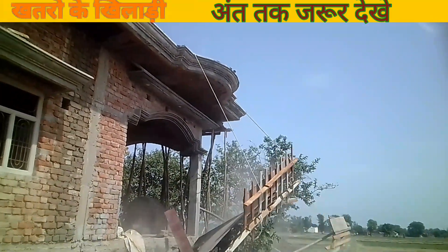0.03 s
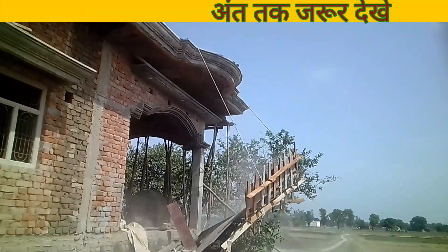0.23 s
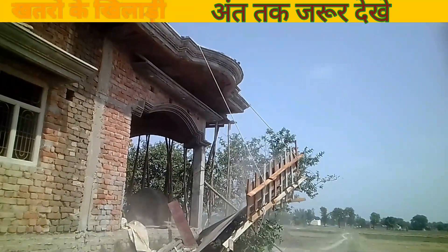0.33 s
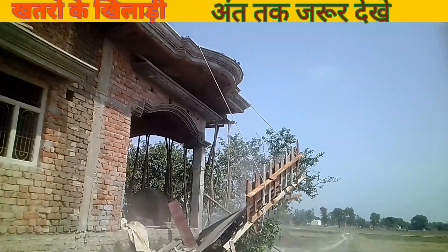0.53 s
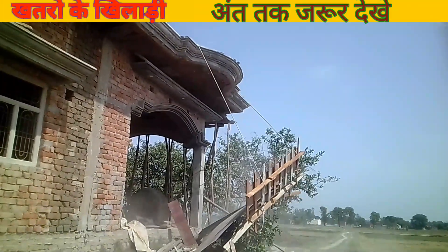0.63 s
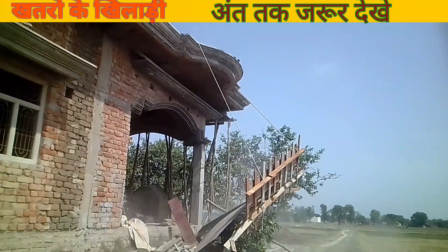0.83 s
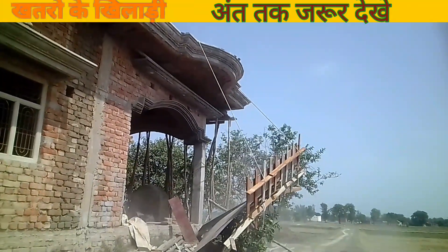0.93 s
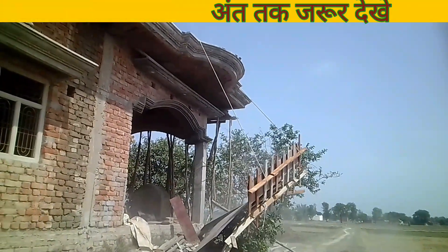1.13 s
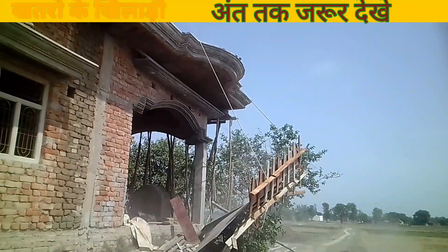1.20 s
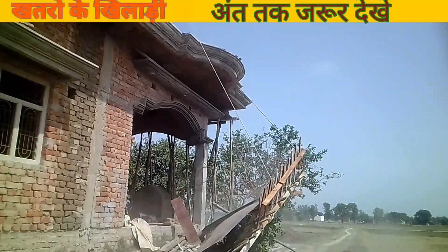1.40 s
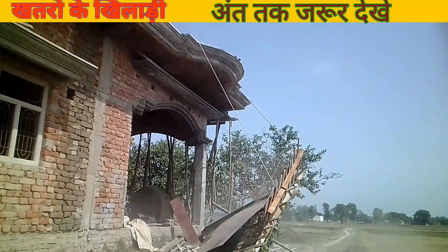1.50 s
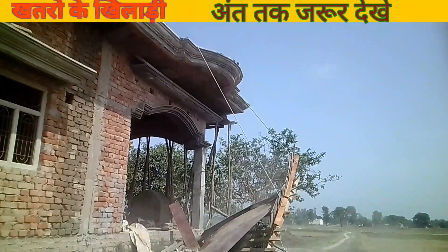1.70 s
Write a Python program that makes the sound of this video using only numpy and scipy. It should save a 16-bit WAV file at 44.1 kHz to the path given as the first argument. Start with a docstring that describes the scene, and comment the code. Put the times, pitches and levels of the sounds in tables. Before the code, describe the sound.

Quiet open air, then a collapsing timber roof bangs and clatters in two quick surges, settles into weakening knocks, and gives one last small clatter; heard from a distance on a phone with slight echo.

```python
"""Quiet outdoor air is heard first; then a timber and sheet-metal roof is pulled down at some distance.
Debris tumbles in a dense clatter: random impulses excite resonances of timber, sheet and grit.
Beams thud as decaying modes; boards and sheets knock and splinters tick as filtered noise bursts.
An open porch adds a short echo, and a rising tone squeaks as a sheet edge rubs."""
import sys
import numpy as np
from scipy import signal
from scipy.fft import rfft, irfft
from scipy.io import wavfile
from scipy.ndimage import uniform_filter1d

SR = 44100
rng = np.random.default_rng(int(sys.argv[2]) if len(sys.argv) > 2 else 0)


def ratio_of_db(decibels):
    """Turn decibels (scalar or array-like) into linear amplitude factors; 0 dB maps to 1."""
    return 10 ** (np.asarray(decibels, float) / 20)


def persist_wave(psi):
    """Save psi, clipped to +-1, as 16-bit WAV."""
    counts = np.round(np.clip(psi, -1, 1) * 32767).astype(np.int16)
    wavfile.write(sys.argv[1], SR, np.atleast_2d(counts).T)


N = 77175

# Spectrum of the outdoor air. Each row: frequency in Hz, relative spectral level in dB.
AIR_SPECTRUM = [(15, -18), (25, -11), (43, -17), (100, -4.5), (158, -12.5), (278, -4.5), (491, 2),
                (806, -21), (1840, -9.5), (2620, -16.5), (3100, -26.5), (5000, -27), (7080, -21.5),
                (9200, -28.5), (15400, -40.5)]
# Low resonances of the shaken ground. Each row: frequency in Hz, level in dB above the timber rumble.
GROUND_RESONANCES = [(40, -64), (70, -45), (115, -35.5)]
# A rubbing sheet edge. The row: start in seconds, length in seconds, frequency at the start in Hz,
# rise in Hz per second, level in dB.
EDGE_SQUEAK = (1.398, .072, 2620, 1300, -64)
# Spectral dips of the ground echo. Each row: frequency in Hz, width in Hz, depth from 0 to 1.
GROUND_DIPS = [(796, 160, 0.36), (3105, 430, 0.52)]
# Modes of the timber. Each row: frequency in Hz, relative level in dB, t60 in seconds.
TIMBER_MODES = [(199, -5, 0.24), (250, -6, 0.36), (282.4, -11.5, 0.35), (342.8, 6.5, 0.051),
                (376.8, 0.5, 0.11), (402.7, 4.5, 0.047), (456, -4, 0.089), (495, 5.5, 0.079),
                (534.6, -4.5, 0.12), (603, 0.5, 0.087), (667.5, -4, 0.057), (762, -1, .07)]
# Resonances of sheet metal. Each row: frequency in Hz, nominal width in Hz, relative level in dB.
SHEET_RESONANCES = [(1023.5, 58, 3.5), (1375, 57, 1.5), (1610, 120, -6), (1860, 350, -3.5), (2250, 100, 1),
                    (2562, 460, -6.5)]
# Resonances of grit. Each row: frequency in Hz, nominal width in Hz, relative level in dB.
GRIT_RESONANCES = [(3240, 990, 0), (4310, 500, -5), (5120, 595, -1), (6840, 670, -14.5), (8200, 330, -16),
                   (9300, 1200, -43), (11900, 3100, -46.5)]
# Splinters and stones. Each row: time in seconds, peak level at the source in dB, pitch in Hz.
SPLINTER_TICKS = [(0.0996, -68.5, 4170), (0.119, -69, 4150), (0.2284, -32.5, 4260), (0.4064, -25, 3510),
                  (0.4117, -23, 3720), (0.416, -13, 3470), (0.4217, -24, 3180), (0.4464, -35, 3400),
                  (0.5674, -65, 4050), (0.6566, -39, 3330), (0.6888, -50.5, 3980), (0.7294, -57, 4980),
                  (0.7731, -45, 3250), (0.7886, -55.5, 3780), (0.829, -64.5, 3940), (0.8444, -61, 3350),
                  (0.967, -58, 3850), (1.0037, -49.5, 3260), (1.1506, -61.5, 6480), (1.2999, -64.5, 3420),
                  (1.329, -68, 3800), (1.4566, -62.5, 5600), (1.5341, -29.5, 5140), (1.6992, -55.5, 4900)]
# Beam blows. Each row: time in seconds, peak level at the source in dB, pitch in Hz,
# ring time as a share of the modes' t60, push (rise time of the blow) in seconds.
BEAM_THUDS = [(0.109, -48.5, 417, 0.42, 0.0057), (0.193, -25.5, 680, 1, 0.0082),
              (0.22, -19.5, 503, 0.95, 0.0072), (0.245, -14.5, 361, 0.6, 0.0045),
              (0.27, -18, 343, 0.6, 0.013), (0.407, -27, 268, 0.42, 0.0077),
              (0.455, -23, 459, 0.75, 0.0042), (0.474, -28, 619, 0.27, 0.00933),
              (0.493, -21.5, 584, 0.26, 0.00768), (0.529, -34, 253, 0.69, 0.0044),
              (0.569, -29, 396, 1, 0.0025), (0.603, -26, 394, 0.62, 0.007),
              (0.611, -23.5, 407, 0.38, 0.012), (0.633, -22.5, 378, 0.33, 0.0091),
              (0.654, -25.5, 501, 0.88, 0.0082), (0.691, -34.5, 374, 0.54, 0.007),
              (0.709, -38, 396, 0.6, 0.007), (0.767, -33.5, 458, 1, 0.0073), (0.789, -38, 495, 0.52, 0.007),
              (0.803, -36, 339, 0.54, 0.0099), (0.846, -36, 495, 0.63, 0.01),
              (0.864, -47.5, 560, 0.6, 0.0098), (0.934, -39, 231.4, 1, 0.0042),
              (0.986, -38, 250, 0.45, 0.0074), (1.003, -37, 529, 1, 0.0082),
              (1.027, -36.5, 391, 0.27, 0.0059), (1.061, -41.5, 453, 0.55, 0.007),
              (1.206, -59, 473, 1, 0.0037), (1.306, -49, 570, 0.43, 0.00732),
              (1.324, -55, 495, 0.23, 0.0068), (1.534, -38.5, 660, 0.45, 0.0066),
              (1.56, -45, 418, 0.9, 0.0071), (1.6, -36, 469, 0.68, 0.0045),
              (1.697, -44.5, 400, 0.48, 0.0055), (1.733, -45, 357, 0.97, 0.011)]
# Settling boards and sheets. Each row: time in seconds, peak level at the source in dB, pitch in Hz,
# t60 in seconds, grit level in dB relative to the pitched part, sharpness Q.
BOARD_KNOCKS = [(0.1206, -55.5, 1554, 0.04, -19, 4.2), (0.165, -43.5, 2190, 0.092, -29, 3),
                (0.18, -29, 1620, 0.24, -6, 1.47), (0.1996, -24, 1294, 0.24, -16.5, 2.9),
                (0.2229, -20.5, 1800, 0.24, -21, 3), (0.2503, -16.5, 2240, 0.24, -10, 3.64),
                (0.2641, -15.5, 1020, 0.066, -3, 1.6), (0.2799, -14.5, 1410, 0.091, -32, 1.4),
                (0.2983, -16.5, 1380, 0.035, -28, 4.6), (0.4032, -29, 2050, 0.24, -12, 2.3),
                (0.4135, -9.5, 2290, 0.066, -17, 2.8), (0.4189, -12.5, 2144, 0.03, -22.5, 4.05),
                (0.4264, -23.5, 2053, 0.027, -9, 7.9), (0.4479, -23, 1900, 0.1, -13.5, 4),
                (0.4633, -20.5, 1787, 0.089, -21, 3.5), (0.526, -29.5, 2430, 0.092, -21, 4.8),
                (0.5645, -31, 1210, 0.078, -8.5, 2.4), (0.598, -33.5, 1404, 0.1, -17, 3),
                (0.6554, -38, 2250, 0.075, -18, 3.1), (0.7871, -45.5, 2380, 0.1, -14.5, 5),
                (0.9364, -56, 1960, 0.07, -5.5, 4), (0.944, -47, 2400, 0.044, -24, 5.8),
                (0.9716, -49, 1780, 0.08, -16, 6.3), (1.0024, -38.5, 2030, 0.049, -20, 5),
                (1.0174, -37, 1573, 0.027, -26, 2.6), (1.0289, -39, 1490, 0.074, -31, 5.2),
                (1.0494, -50, 1410, 0.063, -23.5, 6.4), (1.295, -54, 2093, 0.1, -17, 5.2),
                (1.3071, -42, 1875, 0.092, -20, 3.5), (1.3197, -45, 1840, 0.054, -24, 3.5),
                (1.4586, -49.5, 1520, 0.07, -19.5, 2.1), (1.5332, -26.5, 1520, 0.14, -8, 1.85),
                (1.5443, -35.5, 1490, 0.11, -7, 6.6), (1.5968, -24.5, 1600, 0.093, -7, 3.8),
                (1.618, -45, 1820, 0.039, 5, 5.9), (1.6859, -45, 1800, 0.071, -17, 12),
                (1.726, -46.5, 1800, 0.063, -18.5, 6.9)]
# Course of the fall. Each row: time in seconds, then the levels at the source in dB of
# timber rumble, sheet clatter and grit.
FALL_LEVELS = [(0.0, -69.5, -79.5, -82), (0.14, -61.5, -70.5, -80), (0.218, -28, -72, -87.5),
               (0.248, -22, -65, -80.5), (0.292, -22, -56, -54), (0.326, -34.5, -48, -59),
               (0.35, -37, -39.5, -55.5), (0.394, -32.5, -53, -56), (0.414, -30, -51, -58),
               (0.438, -31.5, -49, -53), (0.466, -27, -32.5, -49), (0.516, -33, -63, -52.5),
               (0.588, -38, -46, -54), (0.608, -35, -47, -81), (0.632, -39, -49, -61),
               (0.658, -39, -64, -63), (0.74, -53, -57, -77.5), (0.798, -39, -64.5, -73.5),
               (0.828, -54, -71, -68.5), (0.866, -43, -74.5, -82), (0.926, -61.5, -74, -87.5),
               (1.018, -43.5, -62, -77), (1.168, -62, -80.5, -86.5), (1.286, -67.5, -72.5, -81.5),
               (1.324, -52.5, -73, -81), (1.402, -73, -69.5, -86), (1.524, -78.5, -75, -77.5),
               (1.534, -62, -64.5, -83.5), (1.618, -52, -56.5, -74), (1.662, -65.5, -67, -83),
               (1.75, -61.5, -75, -78)]


def unit(x):
    """Normalisation: a signal divided by its root mean square has rms 1."""
    return x / np.sqrt(np.mean(x ** 2))


def band(x, hz, width):
    """Second-order resonance: the gain is 1 at the centre and falls off on both sides."""
    return signal.lfilter(*signal.iirpeak(hz, hz / width, fs=SR), x)


def steep(x, peaks):
    """Cascaded resonance: passing each peak twice steepens its skirts and keeps the valleys dark."""
    total = 0
    for k, (hz, width, db) in enumerate(peaks):
        once = band(x, hz, 1.28 * width)
        twice = band(once, hz, 1.28 * width)
        total = total + (-1) ** k * ratio_of_db(db) * twice  # neighbours alternate in sign
    return unit(total)


def decay(t, t60):
    """Exponential damping: the amplitude falls by 60 dB in each t60."""
    return np.exp(-np.log(1000) * t / t60)


def ring(x, hz, t60):
    """Damped mode: a complex pole turns each impulse into a decaying sinusoid."""
    pole = np.exp(2j * np.pi * hz / SR) * decay(1 / SR, t60)
    return signal.lfilter([1], [1, -pole], x).imag


def grains(rate):
    """Random collisions: impulses at a mean rate per second, a few of them much larger."""
    struck = rng.random(N) < rate / SR
    spread_db = 4.5 * rng.exponential(size=N).clip(0, 3)
    return struck * rng.standard_normal(N) * ratio_of_db(spread_db)


def drive(column):
    """Time-varying excitation: one level column of the fall, interpolated in dB, becomes a gain."""
    table = np.array(FALL_LEVELS)
    return ratio_of_db(np.interp(np.arange(N) / SR, table[:, 0], table[:, column]))


def field():
    """Stationary ambience: noise shaped in the frequency domain gives the quiet outdoor air."""
    level_db = -73.5  # rms
    hz, db = np.array(AIR_SPECTRUM).T
    f = np.arange(N // 2 + 1) * SR / N + 1  # 1 Hz up, to keep the logarithm finite
    shape = ratio_of_db(np.interp(np.log(f), np.log(hz), db))
    air = irfft(rfft(rng.standard_normal(N)) * shape, N)
    return ratio_of_db(level_db) * unit(air)


def shake():
    """Ground vibration: low resonant noise follows the level of the timber rumble."""
    bass = 0
    for hz, db in GROUND_RESONANCES:
        bass = bass + ratio_of_db(db) * steep(rng.standard_normal(N), [(hz, hz / 2.9, 0)])
    return drive(column=1) * bass


def squeak():
    """Frictional tone: a thin sinusoid rises while its frequency and level waver at random."""
    start, length, hz, rise, db = EDGE_SQUEAK
    u = np.arange(N) / SR - start
    wobble = unit(uniform_filter1d(rng.standard_normal((2, N)), size=120))
    frequency = hz + rise * u + 70 * wobble[0]
    tone = np.sin(2 * np.pi * np.cumsum(frequency) / SR) * ratio_of_db(3.3 * wobble[1])
    fade = np.clip(5 * np.minimum(u, length - u) / length, 0, 1)  # a fifth of the length at each end
    return ratio_of_db(db) * tone * fade


def porch(x):
    """Reverberation: convolution with a decaying, dull noise tail gives the brick porch's short echo."""
    t60_s, echo_db, top_hz, delay_s = 0.23, -13.5, 2550, 0.008
    t = np.arange(SR // 2) / SR
    tail = rng.standard_normal(len(t)) * decay(t, t60_s) * (t > delay_s)
    tail = signal.lfilter(*signal.butter(1, top_hz, fs=SR), tail)
    tail = tail / np.sqrt(np.sum(tail ** 2))  # unit energy
    return ratio_of_db(echo_db) * signal.fftconvolve(x, tail)[:N]


def ticks():
    """Brief impacts: broadly resonant noise with a very fast rise and decay clicks dryly."""
    rise_s, t60_s, q = 0.00053, 0.01, 4.5
    out, t = np.zeros(N + SR), np.arange(SR // 20) / SR
    envelope = (1 - np.exp(-t / rise_s)) * decay(t, t60_s)
    for time, db, hz in SPLINTER_TICKS:
        tick = envelope * steep(rng.standard_normal(len(t)), [(hz, hz / q, 0)])
        first = int((time - 0.001) * SR)
        out[first:][:len(t)] += ratio_of_db(db) * tick / np.abs(tick).max()
    return out[:N]


def thuds():
    """Modal excitation: a soft blow rings the timber modes that lie near its pitch."""
    focus_oct = 0.36  # spread of the excited modes around the pitch
    out, t = np.zeros(N + SR), np.arange(SR // 3) / SR
    for time, db, pitch, ringing, push in BEAM_THUDS:
        tone = np.zeros(len(t))
        for hz, mode_db, t60 in TIMBER_MODES:
            nearness = np.exp(-(np.log2(hz / pitch) / focus_oct) ** 2)
            wave = np.sin(2 * np.pi * hz * t + rng.uniform(0, 2 * np.pi))
            tone += ratio_of_db(mode_db) * nearness * decay(t, t60 * ringing) * wave
        tone = tone * (1 - np.exp(-(t / push) ** 2))
        first = int((time + 0.004 - push) * SR)  # a slower push begins earlier
        out[first:][:len(t)] += ratio_of_db(db) * tone / np.abs(tone).max()
    return out[:N]


def knocks():
    """Resonant bursts: damped noise takes a pitch of its own, the sheet's ring and a spray of grit."""
    rise_s, sheet_db = 0.003, -9
    out, t = np.zeros(N + SR), np.arange(SR // 3) / SR
    for time, db, hz, t60, grit_db, q in BOARD_KNOCKS:
        rattle, spray = rng.standard_normal((2, len(t)))
        tone = steep(rattle, [(hz, hz / q, 0)])
        tone = tone + ratio_of_db(sheet_db) * steep(rattle, SHEET_RESONANCES)
        tone = tone + ratio_of_db(grit_db) * steep(spray, GRIT_RESONANCES)
        burst = (1 - np.exp(-(t / rise_s) ** 2)) * decay(t, t60) * tone
        first = int((time - 0.004) * SR)
        out[first:][:len(t)] += ratio_of_db(db) * burst / np.abs(burst).max()
    return out[:N]


def tumble():
    """Stochastic excitation: many small collisions ring timber, sheet and grit as the fall drives them."""
    hit_rate = 900  # collisions per second
    hits = grains(hit_rate)  # shared by sheet and grit
    wood = unit(sum(ratio_of_db(db) * ring(grains(hit_rate), hz, t60) for hz, db, t60 in TIMBER_MODES))
    sheet = steep(hits + grains(3000), SHEET_RESONANCES)
    grit = steep(hits + grains(8200), GRIT_RESONANCES)
    return wood * drive(column=1) + sheet * drive(column=2) + grit * drive(column=3)


def scene():
    """Superposition: the band-limited, ground-dipped fall adds to the shake, the squeak and the field."""
    phone_low_hz, phone_top_hz = 167.3, 6880
    blows = thuds() + knocks() + ticks()
    fall = blows + porch(blows) + tumble()
    low_cut = signal.cheby2(6, 40, phone_low_hz, "high", fs=SR, output="sos")
    high_cut = signal.butter(3, phone_top_hz, fs=SR, output="sos")
    fall = signal.sosfilt(high_cut, signal.sosfilt(low_cut, fall))
    for hz, width, depth in GROUND_DIPS:
        fall = fall - depth * band(fall, hz, width)
    return (fall + shake() + squeak() + field())[None]  # one channel


def top_cut(x):
    """Nothing passes above the cut-off."""
    return signal.sosfilt(signal.butter(12, 15480, fs=SR, output="sos"), x)


def record(dry):
    """Capture: the finished mix passes through the phone."""
    return top_cut(dry)


dry = scene()
out = record(dry)
persist_wave(out)
```